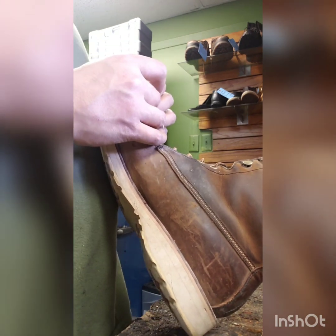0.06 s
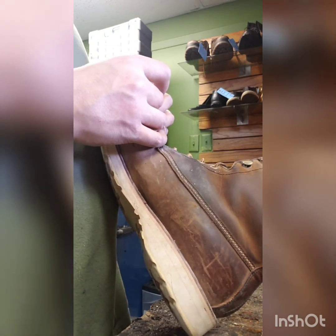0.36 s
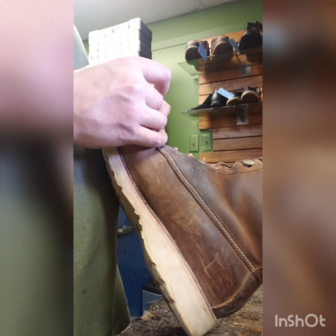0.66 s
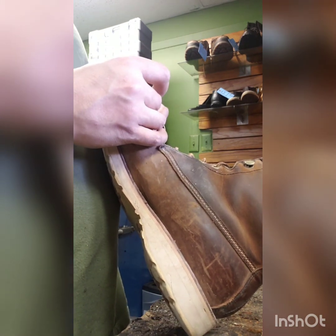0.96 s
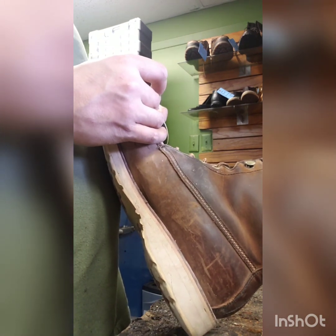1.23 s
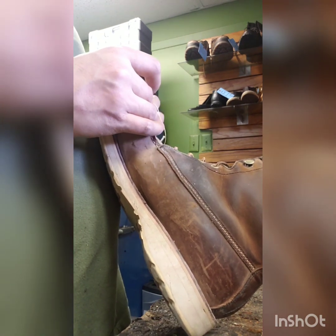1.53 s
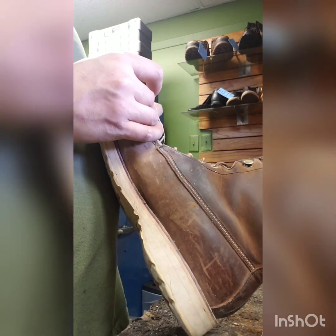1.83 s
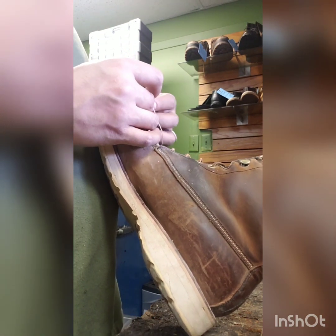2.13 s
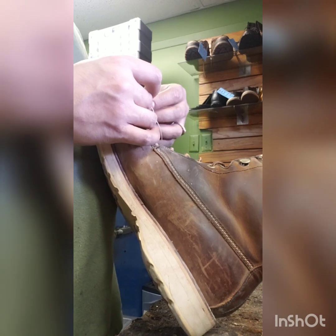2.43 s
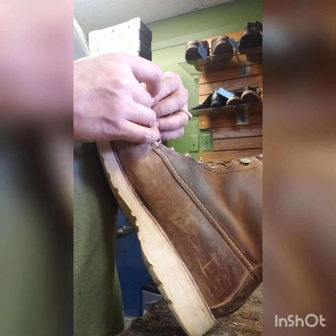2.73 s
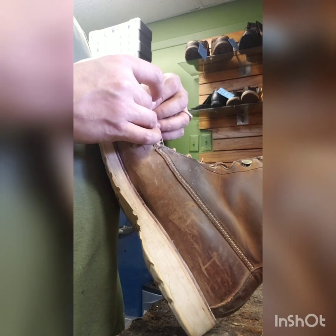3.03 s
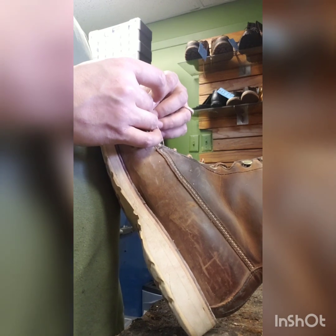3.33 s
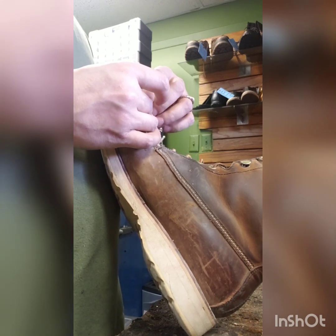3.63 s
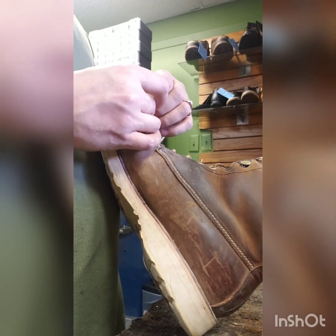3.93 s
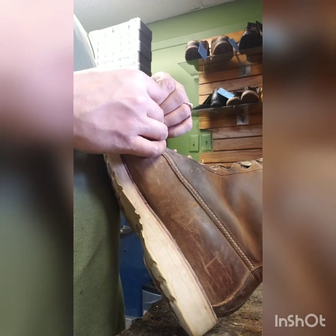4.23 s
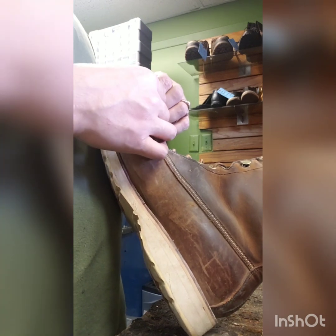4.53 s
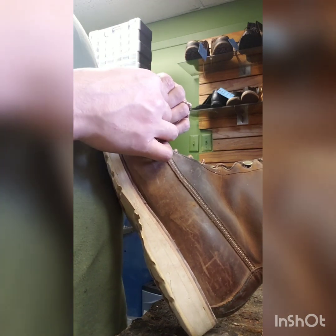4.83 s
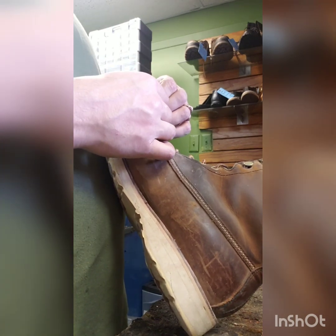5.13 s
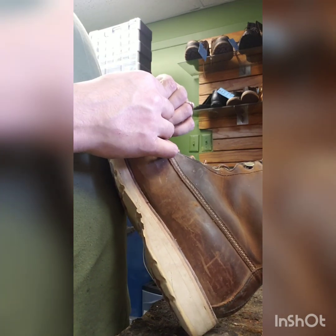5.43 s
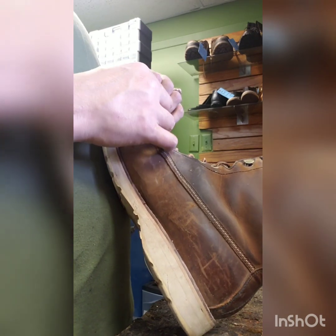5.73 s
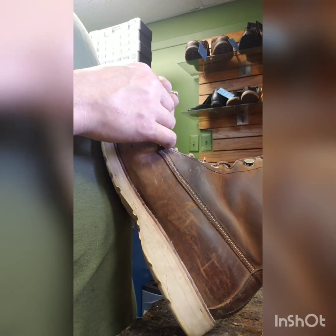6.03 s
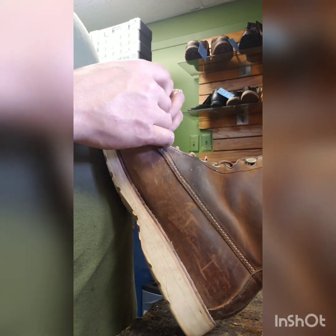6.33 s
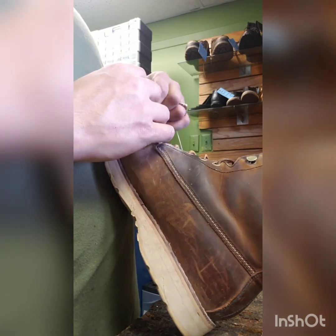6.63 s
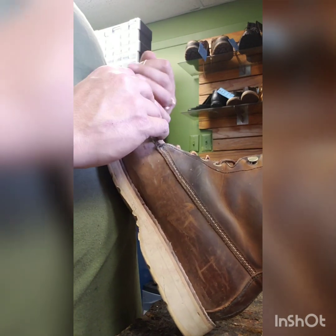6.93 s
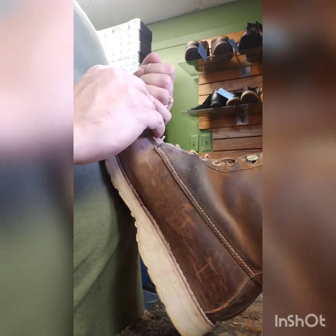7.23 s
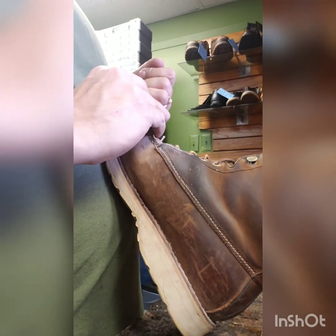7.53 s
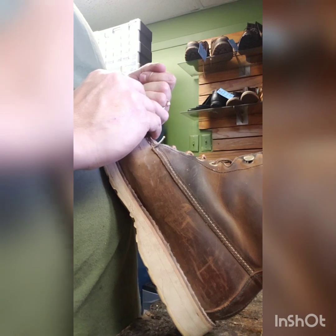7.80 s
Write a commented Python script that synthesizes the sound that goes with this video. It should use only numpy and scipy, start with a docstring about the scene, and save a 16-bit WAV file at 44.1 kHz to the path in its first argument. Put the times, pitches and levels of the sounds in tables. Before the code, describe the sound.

A steady low hum of a motor and mains, with a fan's rumble and faint hiss, fills a small workshop for all eight seconds. Over it come quiet, close sounds of a leather boot being stitched by hand, leaning to the right. Hands and sleeves brush softly on the leather throughout. Two tiny needle ticks come at about 1.2 seconds, then nylon thread slides faintly until about 2.5 seconds. At 4.2 seconds one short, sharp tug stands out, followed by a thin thread hiss and a couple of small, dull clicks around 4.7 seconds. Another tick and a brief zip come at 5.8 seconds. From about 6.2 to 7.6 seconds the thread is drawn out in a long, uneven, high rasp, with a click and a brief leather creak at 7 seconds as the stitch tightens. A last faint tick falls near 7.8 seconds.

```python
"""First comes the steady hum of a motor and the mains, with a fan's rumble, in a small workshop.
Hands and sleeves rustle on a leather boot being stitched by hand; needle and fingers make tiny ticks.
Close by on the right, nylon thread rasps as it slips through the holes: it is eased along, tugged
once, then drawn out in a long pull, and the leather creaks as the stitch tightens."""
import sys
import numpy as np
from scipy.fft import rfft, irfft, next_fast_len
from scipy.io import wavfile
from scipy.ndimage import map_coordinates

SR = 44100
rng = np.random.default_rng(int(sys.argv[2]) if len(sys.argv) > 2 else 0)


def materialize(psi):
    """Save the field psi as 16-bit PCM at rate SR to the path in sys.argv[1].

    A 1-D psi becomes a single channel; in a 2-D psi each row is a channel.
    """
    bounded = np.clip(np.atleast_2d(psi).T, -1, 1)
    quanta = np.round(bounded * 32767).astype(np.int16)
    wavfile.write(sys.argv[1], SR, quanta)


N = 355446

# Table levels are relative: the functions scale and pan them. A "colour" is a noise's spectrum.
# tones of the motor and the mains: multiple of the base pitch, level/dB
MOTOR_TONES = [(1, -72.5), (3, -56), (4, -51), (6, -69.5), (7, -60.5), (8, -60.5), (10, -64), (13, -60.5),
               (15, -67), (22, -78), (24, -77.5)]
MAINS_TONES = [(2, -45.5), (4, -69.5), (6, -71.5), (8, -78), (12, -87.5), (16, -99.5), (20, -91)]
# the motor's whine: f/Hz, pitch wander/Hz, level/dB
WHINE_TONES = [(546, 1.8, -74.5), (779, 2.275, -69.5)]
# colour of the fan's moving air: f/Hz, level/dB
FAN_COLOUR = [(15, -30), (35, -18.5), (50, -6.5), (85, -3.5), (130, -6), (190, -13), (280, -13.5),
              (400, -17), (560, -22), (800, -25), (1000, -34), (1350, -35.5), (1750, -46.5), (3000, -65)]
# pitches the room boosts: f/Hz, width/Hz, boost/dB
ROOM_RESONANCES = [(57.7, 6.6, 8), (109.6, 7.7, 8), (167.1, 8, 8), (224, 7.3, 7), (328, 12, 4.5),
                   (420.4, 14, 4), (655, 16, 3)]
# how alike the rumble is in both ears: f/Hz, likeness (1 = same, 0 = unrelated)
FAN_LIKENESS = [(60, 0.98), (130, 0.99), (290, 0.94), (640, 0.84), (900, 0.041), (1400, -0.29),
                (3000, -0.1)]
# which side hum and rumble lean to: f/Hz, left minus right/dB
DRONE_LEAN = [(60, 1.66), (200, 1), (380, 0), (560, -4), (720, -8), (900, -7.5), (1300, -5), (2300, 1.5)]
# colours of the background hiss and of rubbing sleeves: f/Hz, level/dB
HISS_COLOUR = [(1060, -32), (1800, -3.5), (2520, -2), (2990, -6), (4410, -7.5), (7670, -17.5),
               (9120, -17.5), (11400, -7), (12600, -5), (15100, -6), (15700, -5)]
SLEEVE_COLOUR = [(200, -12), (450, 0), (800, -0.5), (1000, -1.5), (1300, -1), (1700, -15), (2200, -14.5),
                 (3000, -24.5), (5000, -31), (8000, -50.5)]
# hands shifting on the boot: peak t/s, rise and fall/s, level/dB
HAND_MOVES = [(.1, .35, -76.5), (1.35, .16, -72.5), (2.18, .32, -71.5), (2.85, .14, -74.5),
              (4.25, 0.22, -72), (4.65, 0.23, -71), (5.47, .22, -71), (5.79, 0.2, -68.5),
              (6.3, 0.26, -69.5), (7.03, .16, -67), (7.4, .14, -72), (7.95, 0.42, -75.5)]
# needle and finger contacts: t/s, crack level/dB, knock level/dB
CONTACTS = [(1.2, -69, -78), (1.265, -70.5, -63), (4.6128, -70, -65), (4.7067, -68, -56.5),
            (5.1394, -72.5, -79), (5.755, -71.5, -65), (7.0, -67, -63), (7.8316, -69.5, -80)]
# colours of a contact's sharp crack and dull knock: f/Hz, level/dB
CRACK_COLOUR = [(800, -6), (2500, -10), (4200, -6), (5600, 3), (6600, -13), (7800, -3.5), (9500, -18),
                (12500, -5.5), (16000, -11.5)]
KNOCK_COLOUR = [(150, -16), (450, -3), (750, 0), (1300, -5.5), (1900, -22), (4000, -38), (8000, -59)]
# thread pulls: fastest t/s, rise/s, fall/s, rasp level/dB, sizzle level/dB, fibre hiss level/dB
THREAD_PULLS = [ (1.305, .06, .13, -86, -91, -84.5), (1.52, .11, .1, -94, -97, -84),
                (2.25, .2, .18, -86, -102, -93), (4.425, .12, .12, -84, -93, -78.5),
                (4.625, .035, .06, -85, -88, -80), (5.70, .035, .05, -87, -89, -78),
                (5.758, .013, .065, -81, -81.5, -72.5), (6.28, .09, .05, -80, -82, -78.5),
                (6.40, .25, .25, -94, -94, -79), (6.465, 0.054, .06, -78.5, -78, -80.5),
                (6.66, .035, 0.13, -92, -81, -75.5), (6.79, .07, .09, -78, -88, -90),
                (7.025, .05, 0.056, -74, -85, -75.5), (7.30, .07, .06, -82, -86, -74),
                (7.395, .11, .1, -72.5, -81, -76.5), ]
# thread running on between pulls: middle t/s, rise and fall/s, rasp level/dB
THREAD_DRAGS = [(1.9, .15, -93), (4.57, .23, -87), (7.05, .35, -81.5)]
# colours of the sliding thread and the leather it rubs: f/Hz, level/dB
RASP_COLOUR = [(2800, -23.5), (4200, -20.5), (4900, -6.5), (5400, -0.5), (5900, -2.5), (6350, -22),
               (7200, -40)]
SIZZLE_COLOUR = [(6000, -33), (6700, -12), (7200, 0.5), (7900, -1), (8500, -11), (9600, -18.5),
                 (11000, -30)]
FIBRE_COLOUR = [(8500, -21), (10200, -11.5), (11300, -0.5), (12400, 2.5), (13700, -2), (15000, -2),
                (16000, -3.5)]
LEATHER_COLOUR = [(400, -26), (800, 0.5), (1250, 5.5), (1700, -7), (2200, -15), (2900, -26), (4500, -33)]
# pitches that ring in the tug and in the tightening stitch: f/Hz, width/Hz, level/dB
TUG_RESONANCES = [(554, 500, 16.5), (1260, 410, 10), (2290, 600, -5.5), (3660, 550, -3), (4680, 500, -4.5),
                  (5400, 640, -0.5), (7780, 1300, -4.5), (9600, 1500, -9), (11270, 1200, -2.5),
                  (12500, 1300, 0), (14700, 2400, -1.5)]
CREAK_RESONANCES = [(2040, 450, -0.5), (5150, 450, 0)]


def amp(db):
    """Turn decibels into a gain to multiply by."""
    return 10 ** (np.asarray(db) / 20)


def unit(x):
    """Scale a sound to an average (rms) level of 1."""
    return x / np.sqrt(np.mean(x ** 2) + 1e-20)


def along(points, hz):
    """Read between the rows of a (frequency, value) table, on a log frequency scale."""
    freqs, values = np.transpose(points)
    return np.interp(np.log(hz + 1), np.log(freqs + 1), values)


def noise():
    """Separate white noise for each ear."""
    return rng.standard_normal((2, N))


def wobble(rate):
    """A smooth curve through `rate` random points a second."""
    points = rng.standard_normal(int(N * rate / SR) + 4)
    return map_coordinates(points, [np.arange(N) * rate / SR])


def swell(peak_s, rise_s, fall_s, drop_db, curve):
    """A gain of 1 at the peak, drop_db lower a rise before and a fall after; curve 1 is pointed, 2 round."""
    t = np.arange(N) / SR - peak_s
    away = np.minimum(np.abs(t) / np.where(t < 0, rise_s, fall_s), 20)
    return amp(-drop_db * away ** curve)


def filtered(x, gain_at):
    """Turn each frequency up or down by gain_at(hz)."""
    size = next_fast_len(N + 8192)
    return irfft(rfft(x, size) * gain_at(np.fft.rfftfreq(size, 1 / SR)), size)[..., :N]


def coloured(x, colour):
    """Give a sound a colour, at level 1."""
    return unit(filtered(x, lambda hz: amp(along(colour, hz))))


def rung(x, resonances):
    """Make a sound ring around a few pitches, at level 1."""
    def peaks(hz):
        return sum(amp(db) / (1 + (2 * (hz - f) / width) ** 2) ** 1.3 for f, width, db in resonances)
    return unit(filtered(x, peaks))


def panned(x, lean_db):
    """Lean a sound left (positive) or right (negative)."""
    return x * amp([[lean_db / 2], [-lean_db / 2]])


def hum(base_hz, tones, drift, flutter_db):
    """Something turning a little unsteadily hums at multiples of its speed."""
    turns = np.cumsum(base_hz * (1 + drift * wobble(2.51))) / SR
    sound = np.zeros(N)
    for multiple, db in tones:
        level = amp(db + flutter_db * wobble(3.6))
        sound += level * np.sin(2 * np.pi * (round(multiple) * turns + rng.random()))
    return np.sqrt(2) * sound


def machine():
    """The motor's shaft and the mains hum, along with a thin, wavering whine."""
    sound = hum(base_hz=24.9, tones=MOTOR_TONES, drift=0.00098, flutter_db=1.05)
    sound += hum(base_hz=60.02, tones=MAINS_TONES, drift=0.00022, flutter_db=1.34)
    for hz, wander_hz, db in WHINE_TONES:
        turns = np.cumsum(hz + wander_hz * wobble(8)) / SR
        sound += np.sqrt(2) * amp(db + 1.5 * wobble(6.5)) * np.sin(2 * np.pi * turns)
    return sound


def fan():
    """Moving air rumbles and the room boosts some pitches; both ears hear nearly the same bass."""
    def gains(hz):
        boost_db = sum(db * np.exp(-.5 * ((hz - f) / width) ** 2) for f, width, db in ROOM_RESONANCES)
        spread = np.arccos(np.clip(along(FAN_LIKENESS, hz), -1, 1)) / 2
        return amp(along(FAN_COLOUR, hz) + boost_db) * [np.cos(spread), np.sin(spread)]
    shared, opposite = filtered(noise(), gains)
    return amp(-47.5) * unit(np.array([shared + opposite, shared - opposite]))


def hiss():
    """A faint, even hiss lies behind everything."""
    return panned(amp(-76) * coloured(noise(), HISS_COLOUR), lean_db=0.8)


def hands(holding_db=-86.5, patchy_db=2.3):
    """Cloth and skin brush the leather: faintly while holding it, louder when the grip shifts."""
    power = sum((amp(db + 1) * swell(t, length, length, drop_db=9.5, curve=1.3)) ** 2
                for t, length, db in HAND_MOVES)
    level = np.sqrt(amp(holding_db) ** 2 + power)
    brushing = noise() * amp(patchy_db * wobble(22))
    return panned(level * coloured(brushing, SLEEVE_COLOUR), lean_db=-6.5)


def ticks(crack_s=0.013, room_s=.16, room_db=-10, knock_s=0.13):
    """Each touch of needle or finger makes a crack, a short answer from the room and a dull knock."""
    t = np.arange(SR // 4) / SR
    crack_fade = amp(-60 * t / crack_s) + amp(room_db - 60 * t / room_s)  # times to fade by 60 dB
    knock_fade = amp(-60 * t / knock_s) * (1 - np.exp(-t / 0.0037))
    crack, knock = np.zeros((2, N + SR))
    for start_s, crack_db, knock_db in CONTACTS:
        start = round(start_s * SR)
        crack[start:start + len(t)] += amp(crack_db) * crack_fade
        knock[start:start + len(t)] += amp(knock_db) * knock_fade
    sharp = amp(-5) * crack[:N] * coloured(noise(), CRACK_COLOUR)
    dull = amp(1) * knock[:N] * coloured(noise(), KNOCK_COLOUR)
    return panned(sharp + dull, lean_db=-7.5)


def friction(slips_per_s, flutter_db, smooth_rub):
    """Rubbing is many tiny random slips on top of a smooth hiss, different in each ear."""
    slips = (rng.random((2, N)) < slips_per_s / SR) * noise()
    return (unit(slips) + smooth_rub * noise()) * amp(flutter_db * wobble(110))


def thread():
    """Sliding thread rasps, sizzles and hisses with each pull, and the leather rustles with the rasp."""
    power = sum(np.outer(amp(levels), swell(t, rise, fall, drop_db=10, curve=1.3)) ** 2
                for t, rise, fall, *levels in THREAD_PULLS)
    rasp, sizzle, fibres = np.sqrt(power)
    drag = sum(amp(db) * swell(t, length, length, drop_db=10, curve=2.8)
               for t, length, db in THREAD_DRAGS)
    rasp = np.hypot(rasp, drag)
    slips = friction(slips_per_s=2300, flutter_db=0.8, smooth_rub=1.2)
    sound = panned(amp(-3) * rasp * coloured(slips, RASP_COLOUR), lean_db=-16)
    sound += panned(amp(-4) * sizzle * coloured(slips, SIZZLE_COLOUR), lean_db=-13.5)
    sound += panned(amp(2.5) * fibres * coloured(slips, FIBRE_COLOUR), lean_db=-8.5)
    return sound + panned(amp(0.5) * rasp * coloured(slips, LEATHER_COLOUR), lean_db=-5)


def tug(peak_s=4.178, lag_s=.013, rise_s=.029, fall_s=.04):
    """One short, sharp pull: the thread's rasp peaks first, the louder ringing stroke just after."""
    rasp = amp(-71.5) * swell(peak_s, rise_s, fall_s, drop_db=14, curve=1.8)
    stroke = amp(-55) * swell(peak_s + lag_s, rise_s, fall_s, drop_db=7, curve=1.6)
    slips = friction(slips_per_s=2500, flutter_db=1, smooth_rub=.7)
    sound = panned(rasp * coloured(slips, RASP_COLOUR), lean_db=-15.5)
    return sound + panned(stroke * rung(slips, TUG_RESONANCES), lean_db=-6.5)


def creak():
    """The leather creaks briefly as the stitch draws tight."""
    level = amp(-70.5) * swell(peak_s=7.025, rise_s=.035, fall_s=.045, drop_db=11, curve=1.3)
    slips = friction(slips_per_s=900, flutter_db=1.5, smooth_rub=.6)
    return panned(level * rung(slips, CREAK_RESONANCES), lean_db=-11)


def scene():
    """Close handwork over the workshop's drone and hiss."""
    drone = filtered(machine() + fan(), lambda hz: amp(np.outer([.5, -.5], along(DRONE_LEAN, hz))))
    return drone + hiss() + hands() + ticks() + thread() + tug() + creak()


def record(dry):
    """Cut away the very highest treble."""
    top_hz = 15750
    return filtered(dry, lambda hz: hz < top_hz)


dry = scene()
out = record(dry)
materialize(out)
```